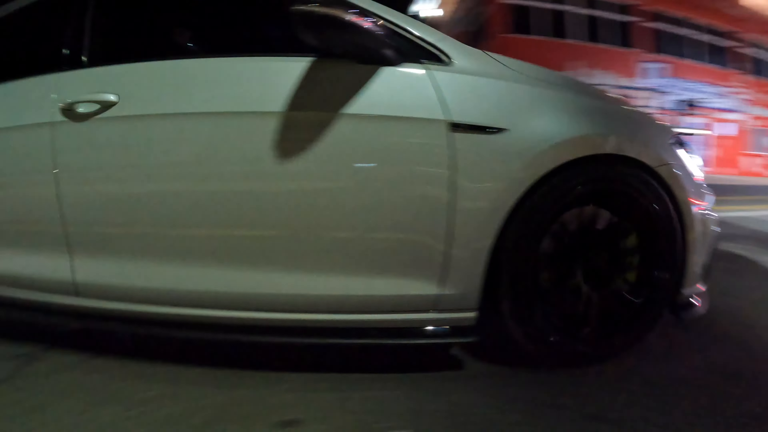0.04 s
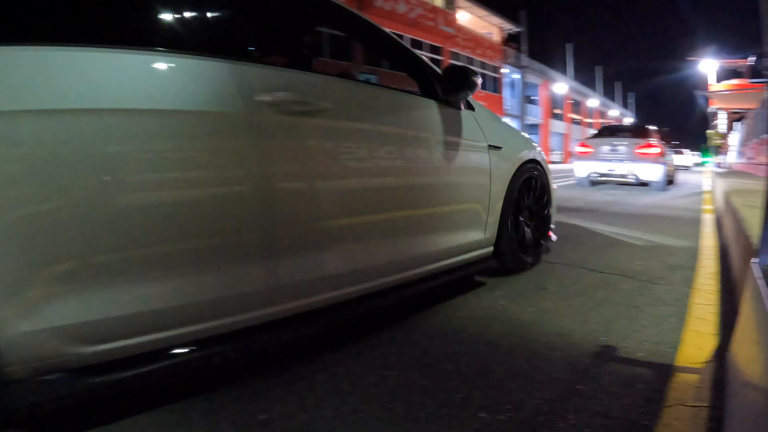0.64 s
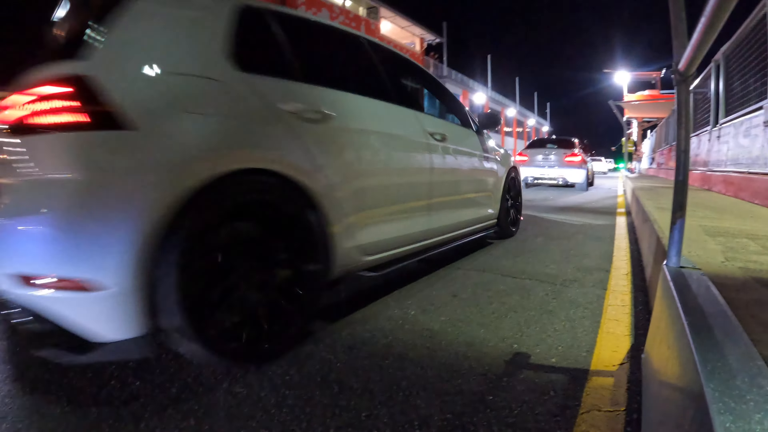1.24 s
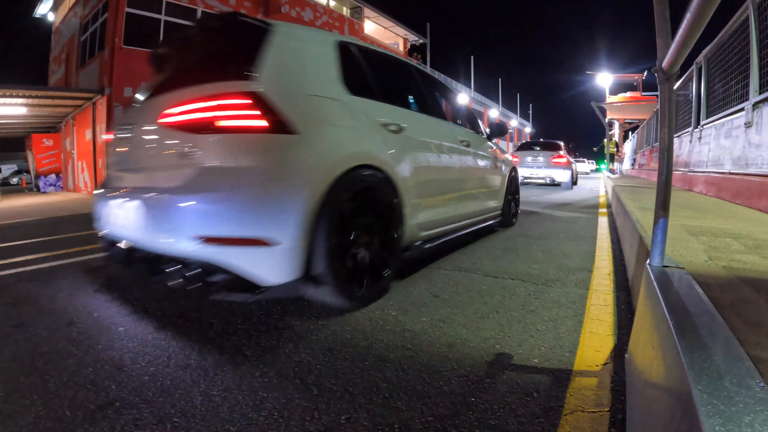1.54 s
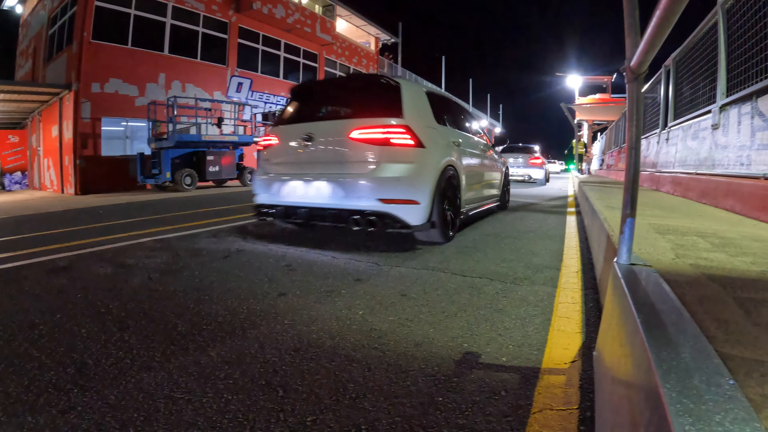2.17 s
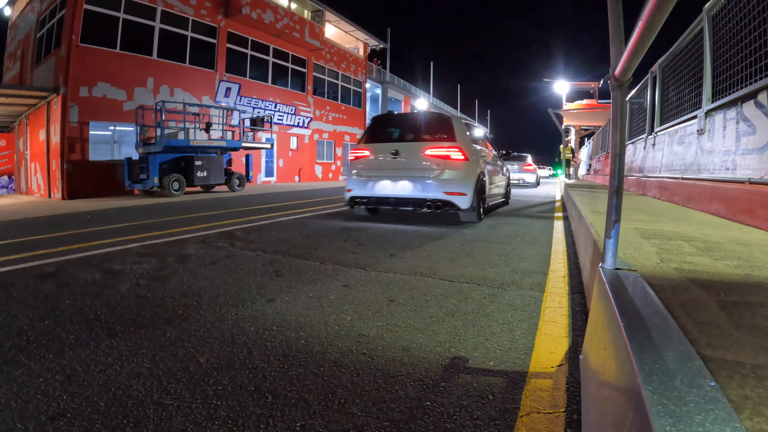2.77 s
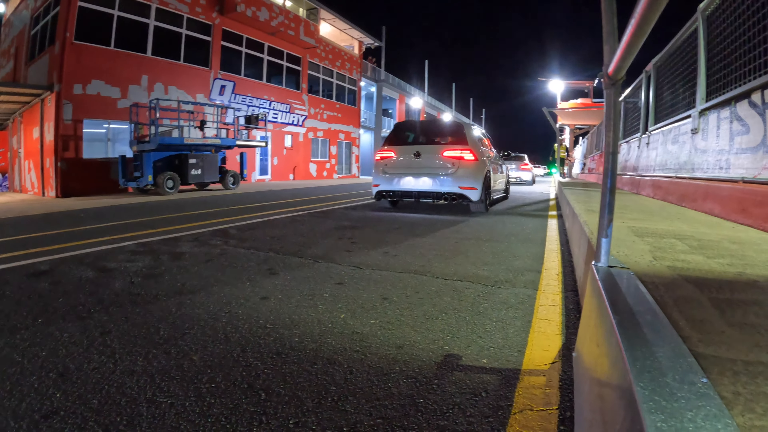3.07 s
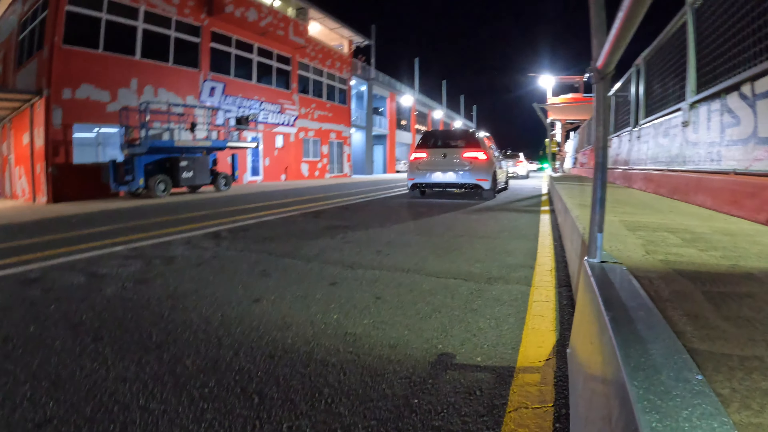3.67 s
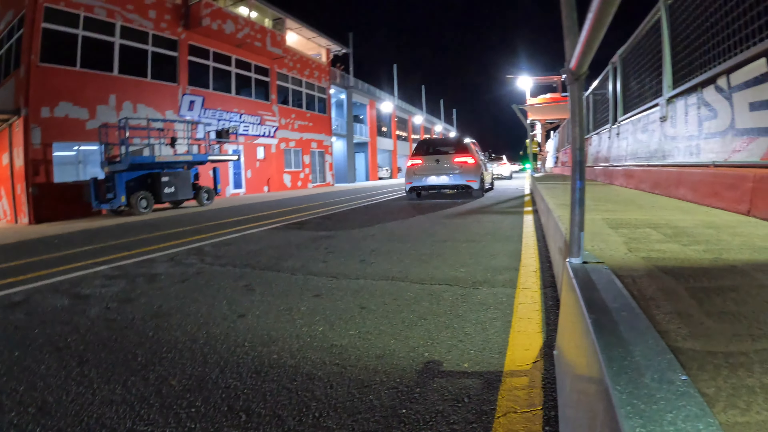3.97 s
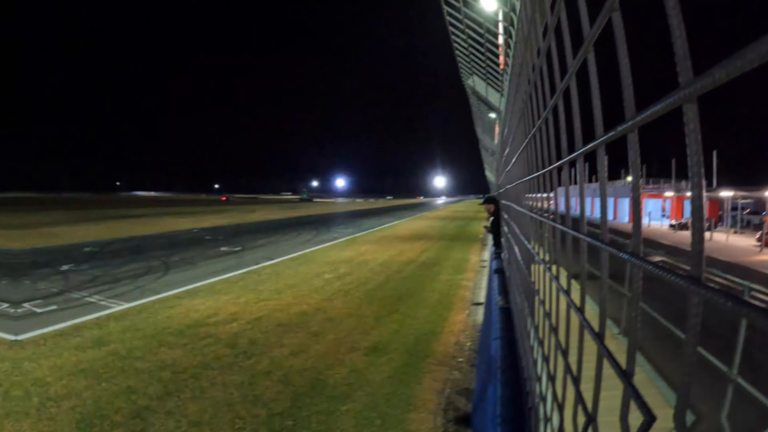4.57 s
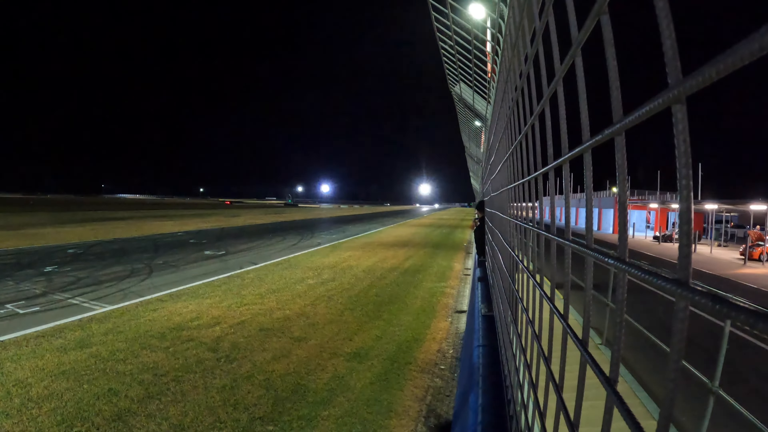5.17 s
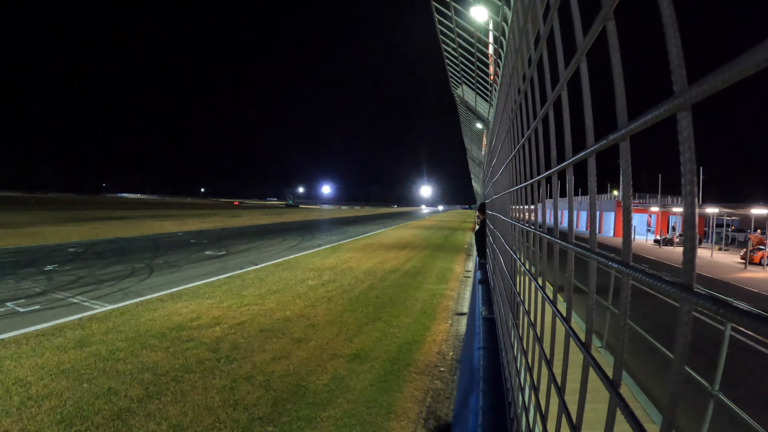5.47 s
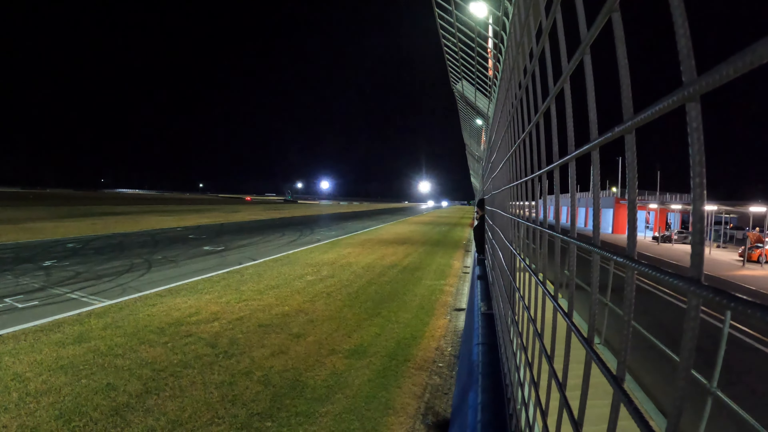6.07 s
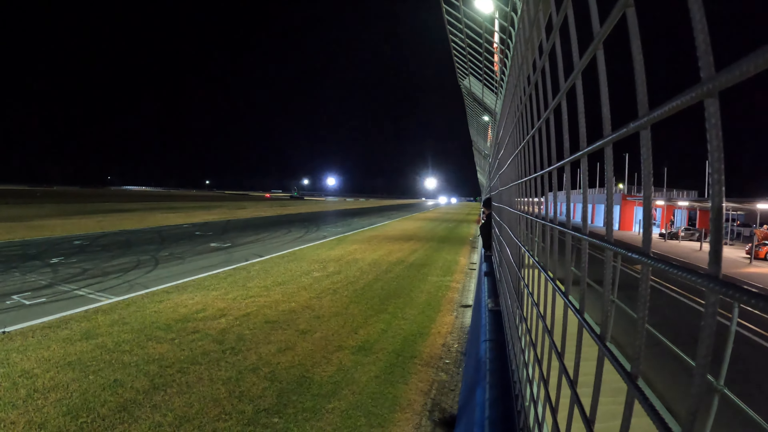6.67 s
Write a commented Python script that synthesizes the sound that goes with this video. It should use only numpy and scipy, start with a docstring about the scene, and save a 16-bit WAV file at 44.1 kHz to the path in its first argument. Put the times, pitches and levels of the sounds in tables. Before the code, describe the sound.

A turbo hatchback crawls close past the microphone in a pit lane, with small tyre chirps, gear whine and a throbbing exhaust. It picks up revs with a deep boom, a rasp of gas and a brief panel buzz, then rolls away as other engines burble and pull off. The nearby engines drop out as the microphone turns to the open track, where a distant race car drones at full throttle, growing louder.

```python
"""Night pit lane, then the straight

A turbo hatchback crawls past, picks up revs and rolls away behind other cars. Its firing pulses boom
and throb in a resonant pipe, gas rasps out in puffs and a loose panel briefly buzzes. Engines up the
lane burble and pull away, blurred by the pit walls into rumble and roar. The microphone then turns
to the track, where a distant racer drones down the straight at full throttle."""
import sys
import numpy as np
from scipy import signal
from scipy.fft import rfft, irfft, next_fast_len
from scipy.io import wavfile

SR = 44100
rng = np.random.default_rng(int(sys.argv[2]) if len(sys.argv) > 2 else 0)


def generate_wav(signal):
    """Clip the signal to [-1, 1] and save it as 16-bit WAV at the path in sys.argv[1]."""
    frames = np.transpose(np.atleast_2d(signal))
    scaled = np.clip(frames, -1, 1) * 32767
    pcm = np.round(scaled).astype(np.int16)
    wavfile.write(sys.argv[1], SR, pcm)


N = 304731
T = np.arange(N) / SR
TURN_S, TURN_LENGTH_S = 4.42, .42  # the microphone swings from the lane to the track
SHADE_DB = -27  # the pit wall shades the side it is not facing


def gain_of(db):
    """Decibels to amplitude."""
    return 10 ** (np.asarray(db) / 20)


def unit_rms(x):
    """Scales to unit rms."""
    return x / np.sqrt(np.mean(x ** 2) + 1e-20)


def curves(rows):
    """Each column after a table's time column as a curve over the scene."""
    times, *columns = np.transpose(rows)
    return [np.interp(T, times, column) for column in columns]


def swell(start, end, db, rise, fall):
    """A gain that holds db from start to end [s], with rise and fall slopes in dB per second."""
    return gain_of(db - rise * np.maximum(start - T, 0) - fall * np.maximum(T - end, 0))


def hump(at, half_length):
    """A bell curve in time [s], peaking at 1."""
    return np.exp(-((T - at) / half_length) ** 2)


def turned():
    """0 while the microphone faces the lane, 1 once it faces the track."""
    return np.clip((T - TURN_S) / TURN_LENGTH_S, 0, 1)


def turns_of(hz):
    """Cycles completed so far."""
    return np.cumsum(hz) / SR


def drift(hz):
    """A random wander of unit rms, with rates up to about hz."""
    size = next_fast_len(N)
    f = np.fft.rfftfreq(size, 1 / SR)
    spectrum = rfft(rng.standard_normal(size)) / (1 + (f / hz) ** 4)
    return unit_rms(irfft(spectrum, size)[:N])


def colour(x, points, size=8192):
    """Minimum-phase EQ through (frequency [Hz], gain [dB]) points; the result has unit rms."""
    hz, db = np.transpose(points)
    f = abs(np.fft.fftfreq(size, 1 / SR))
    log_gain = np.log(gain_of(np.interp(np.log(f + 1), np.log(hz), db)))
    # roll off beyond both ends of the curve
    log_gain -= np.log1p((f / hz[-1]) ** 4) / 2 + np.log1p((hz[0] / (f + 2)) ** 2) / 2
    response = np.exp(np.conj(signal.hilbert(log_gain)))
    impulse = np.fft.ifft(response).real[:size // 2]
    return unit_rms(signal.oaconvolve(x, impulse)[:N])


def noise(points):
    """Noise with the given spectrum."""
    return colour(rng.standard_normal(N), points)


def resonate(x, hz, width_hz):
    """A resonance at hz, which may be steady or a curve."""
    carrier = np.exp(2j * np.pi * turns_of(hz * np.ones(N)))
    pole = np.exp(-np.pi * width_hz / SR)
    return (carrier * signal.lfilter([(1 - pole) ** 2], [1, -2 * pole, pole ** 2], x / carrier)).real


def tone(turns, flutter, flutter_hz):
    """One partial, fluttering in level and phase as its echoes shift."""
    angle = 2 * np.pi * (turns + rng.random())
    in_phase = (1 + flutter * drift(flutter_hz)) * np.cos(angle)
    quadrature = flutter * drift(flutter_hz) * np.sin(angle)
    return unit_rms(in_phase + quadrature)


def tones(turns, orders, flutter, flutter_hz):
    """A stack of fluttering partials from (multiple, relative level [dB]) rows, at unit rms."""
    return unit_rms(sum(gain_of(db) * tone(order * turns, flutter, flutter_hz) for order, db in orders))


def firings(turns, cylinders, rough):
    """One pulse a firing, sized by its cylinder and by uneven combustion."""
    at = np.flatnonzero(np.diff(np.floor(turns)))
    pulses = np.zeros(N)
    pulses[at] = np.resize(cylinders, len(at)) * (1 + rough * rng.standard_normal(len(at)))
    return pulses


def open_track():
    """The track's distant wash opens up with the turn; a low rumble builds under the racer."""
    # spectra of the wash and the rumble: (frequency [Hz], relative level [dB])
    wash_eq = [(60, 0.5), (200, -7), (400, -6.5), (700, -2), (900, -8), (1200, -10), (1550, -12.5),
               (2000, -23.5), (3200, -24.5), (4200, -31), (5200, -44), (8000, -50.5), (11000, -66.5)]
    rumble_eq = [(30, -16), (55, -2), (85, 2.5), (140, 0.5), (230, -6.5), (300, -8.5), (420, -16),
                 (800, -38)]
    wash = gain_of(-56 + 13 * turned() + drift(13)) * noise(wash_eq)
    return wash + swell(6, 6.8, -33, rise=7.5, fall=10) * noise(rumble_eq)


def lane_bed():
    """Engines and tyres smeared by the pit walls into rumble, roar and hiss."""
    # low, middle and high layers of the bed: (frequency [Hz], relative level [dB])
    rumble_eq = [(18, -19), (35, -7.5), (60, -5), (90, 0), (135, -0.5), (175, -3), (230, -6.5), (300, -11),
                 (420, -19.5), (800, -44)]
    roar_eq = [(150, -13), (300, -5), (450, 0), (600, -2.5), (750, -12.5), (950, -13.5), (1150, -15),
               (1450, -15.5), (1750, -26), (2500, -32), (5000, -58)]
    hiss_eq = [(800, -16), (1800, 2), (2200, -1.5), (3000, -1.5), (3600, -7), (4300, -12.5), (6000, -16.5),
               (8000, -21), (10000, -30.5), (14000, -40)]
    coasting_db, pull_away_db = -2.5 * hump(2.4, .65), 4 * hump(3.97, .32)  # the queue of cars
    since_turn = np.maximum(T - TURN_S - TURN_LENGTH_S, 0)
    rumble = gain_of(-22 - 1.2 * T + coasting_db - 13.5 * turned()) * noise(rumble_eq)
    roar = swell(2.1, 4.52, -35.5, rise=2.5, fall=22) * gain_of(.62 * drift(26)) * noise(roar_eq)
    hiss = gain_of(-55 - 7 * turned() - 4 * since_turn + .98 * drift(6.6)) * noise(hiss_eq)
    return gain_of(pull_away_db) * (rumble + roar + hiss)


def air_rushes():
    """Bright, flickering swells of air."""
    # one swell a rush: (start [s], end [s], level [dB], rise [dB/s], fall [dB/s])
    rushes = [(0, 0.09, -57, 10, 18), (.74, 0.817, -59.5, 50, 37), (3.844, 4.198, -67.5, 22, 8.2),
              (4.981, 5.034, -68, 40, 29)]
    # their spectrum: (frequency [Hz], relative level [dB])
    air_eq = [(1000, -5), (2000, -1.5), (3500, 0.5), (5500, -1.5), (8000, -11.5), (11000, -20.5),
              (12500, -17), (15000, -26)]
    return sum(swell(*row) for row in rushes) * gain_of(1.4 * drift(30)) * noise(air_eq)


def thin_squeal():
    """A faint, high squeal up the lane, creeping up in pitch."""
    hz = 5950 + 70 * (T - 3.4)
    level = swell(3.4, 4.2, -73.5, rise=16, fall=60) * gain_of(2.3 * drift(9))
    return level * tone(turns_of(hz), flutter=3, flutter_hz=230)


def tyre_squeaks():
    """Brief chirps of rubber, close by and later in a distant corner."""
    # chirps: (time [s], half length [s], pitch [Hz], level [dB])
    chirps = [(0.084, 0.0082, 1560, -34), (0.122, .011, 1630, -34), (0.25, 0.011, 1640, -42),
              (.36, .012, 1620, -40), (0.674, 0.016, 1030, -31), (5.25, .023, 1240, -47),
              (5.387, .022, 1220, -46.5)]
    return sum(gain_of(db) * hump(at, half) * tone(hz * T, flutter=.51, flutter_hz=30)
               for at, half, hz, db in chirps)


def throbbing_car():
    """A car further off throbs briefly on its firing tone and third harmonic."""
    # its revs: (time [s], firing rate [Hz])
    revs = [(4.1, 66), (4.5, 73), (5.15, 78.8)]
    throb = tones(turns_of(curves(revs)[0]), [(1, 1), (3, -4.5)], flutter=.51, flutter_hz=21)
    return swell(4.5, 4.62, -27, rise=55, fall=70) * throb


def far_car():
    """A far engine gathers speed, and its sixth order sings out for a moment."""
    # its revs: (time [s], crank speed [turns/s])
    revs = [(2.3, 59.4), (2.8, 61.2), (3.1, 62.45), (3.8, 65.4), (4.1, 64.8), (4.3, 65.4), (4.6, 67.4),
            (5, 70)]
    # its engine orders: (multiple of crank speed, relative level [dB])
    orders = [(3, -0.5), (4, 0.5), (5, -6), (6, -3)]
    crank = turns_of(curves(revs)[0])
    hum = swell(2.95, 3.35, -30.5, rise=18, fall=10) * tones(crank, orders, flutter=.14, flutter_hz=8.8)
    sixth = swell(4.15, 4.5, -29.5, rise=45, fall=62) * tone(6 * crank, flutter=.2, flutter_hz=18)
    return hum + sixth


def leading_car():
    """The smooth engine note of the leading car, pulling out and droning on far away."""
    # its run: (time [s], firing rate [Hz], level [dB])
    run = [(3, 104, -59.5), (3.7, 114, -32.5), (4, 120, -25), (4.5, 128, -25), (4.9, 131, -40),
           (5.3, 128, -35), (6, 160, -39), (6.9, 141, -34.5)]
    # its engine orders: (multiple of firing rate, relative level [dB])
    orders = [(.5, -19.5), (1, 4), (1.5, -7), (2, -7), (2.5, -22), (3, -22)]
    hz, db = curves(run)
    return gain_of(db) * tones(turns_of(hz), orders, flutter=.34, flutter_hz=19)


def next_car():
    """The next car up the lane burbles as uneven firings ring its pipe."""
    # its run: (time [s], firing rate [Hz], level [dB])
    run = [(0, 67, -20), (.4, 62, -20), (.75, 65.7, -23.5), (1.3, 57, -26), (1.9, 65, -28.5),
           (2.2, 70, -24.5), (2.5, 68, -23), (2.8, 75, -23.5), (3.1, 74.5, -28), (3.4, 83, -27.5),
           (3.68, 86.6, -21), (4, 90, -24), (4.3, 96, -25), (4.9, 110, -31)]
    # its pipe's response: (frequency [Hz], relative level [dB])
    pipe_eq = [(30, -26), (62, 2.5), (90, 5.5), (130, 3), (165, -2.5), (200, -6.5), (250, -9), (285, -5),
               (320, -12), (370, -16.5), (430, -13.5), (520, -19), (900, -38), (2000, -58)]
    hz, db = curves(run)
    pulses = firings(turns_of(hz), cylinders=[1.15, .7, .82, .95], rough=.22)
    return gain_of(db) * colour(pulses, pipe_eq)


def racer():
    """A four-cylinder at full throttle far away: a clean firing tone over weaker, wavering orders."""
    # its revs: (time [s], engine cycle rate [Hz])
    revs = [(3.9, 36.5), (4.3, 37.8), (4.73, 37.9), (5, 38.75), (5.6, 38.96), (6.02, 39.26), (6.5, 39.55),
            (6.91, 40.4)]
    # brief dips in the firing tone: (time [s], half length [s], depth [dB])
    dips = [(4.75, 0.051, 6.5), (4.994, 0.065, 6.5), (5.42, 0.11, 7.5), (5.925, 0.027, 6),
            (6.153, 0.012, 8.5), (6.803, 0.14, 5)]
    # the firing tone's octave waxes and wanes: (time [s], level before shading [dB])
    octave_fader = [(4.76, -55), (4.86, -34.5), (4.95, -53), (5.0, -32), (5.49, -44), (5.53, -36),
                    (6.12, -37), (6.35, -28), (6.57, -45), (6.81, -27.5), (6.91, -33)]
    # orders from around the double octave up, and the rest: (multiple of cycle, relative level [dB])
    upper_orders = [(15, -5), (16, 2.5), (17, -9), (20, -7.5), (26, -16), (27, -17)]
    body_orders = [(2, -1.5), (3, 1), (5, 6), (6, -3), (7, 0), (9, -5.5), (11, -13.5), (12, -8), (13, -17),
                   (14, -19.5), (15, -15), (17, -17.5), (20, -19), (24, -18), (31, -22)]
    cycles = turns_of(curves(revs)[0])
    fired = 4 * cycles
    dip_db = sum(depth * hump(at, half) for at, half, depth in dips)
    firing_level = swell(4.64, 6.91, -19.8, rise=105, fall=10) * gain_of(-dip_db)
    firing = firing_level * tone(fired, flutter=.06, flutter_hz=14)
    octave_db = curves(octave_fader)[0] + SHADE_DB * (1 - turned())
    octave = gain_of(octave_db) * tone(2 * fired, flutter=.12, flutter_hz=10)
    upper = tones(cycles, upper_orders, flutter=.25, flutter_hz=10)
    upper *= swell(4.9, 5.95, -45.5, rise=18, fall=32)
    # the third harmonic carries over the wall first
    third = swell(4.15, 4.4, -34, rise=40, fall=36) * tone(3 * fired, flutter=.2, flutter_hz=10)
    body = tones(cycles, body_orders, flutter=.31, flutter_hz=11)
    body *= swell(4.7, 6.91, -35.5, rise=20, fall=10)
    build = gain_of(2 * (T - 4.64))  # louder as it runs down the straight
    return build * (firing + third + upper + body) + octave


def turbo():
    """Thin whistles of air through the hatchback's turbo as the revs rise."""
    # whistle peaks over hiss: (frequency [Hz], relative level [dB])
    whistle_eq = [(3500, -7.5), (4300, 3), (5200, 2), (6500, -7), (7000, -3.5), (7500, -1), (7900, -8.5),
                  (9000, -13), (11400, -20.5), (12300, -16.5), (13200, -21)]
    return swell(1.8, 2.02, -62.5, rise=65, fall=24) * noise(whistle_eq)


def tyre_scuffs():
    """The hatchback's tyres scuff the tarmac in short bursts of noise."""
    # scuffs: (time [s], half length [s], level [dB])
    scuffs = [(0.089, 0.036, -32.5), (0.33, 0.036, -37), (0.682, 0.029, -32)]
    # their spectrum: (frequency [Hz], relative level [dB])
    scuff_eq = [(500, -20), (800, -5), (1010, 4), (1150, -11), (1450, -15), (1650, -11.5), (1900, -19),
                (2400, -26), (2800, -21), (4000, -34), (8000, -55)]
    return sum(gain_of(db) * hump(at, half) for at, half, db in scuffs) * noise(scuff_eq)


def gear_whine():
    """The gears' whine sags and lifts as the hatchback slows and picks up again."""
    # the gear note: (time [s], pitch [Hz])
    note = [(0, 1010), (.25, 940), (.4, 880), (.55, 842), (.75, 832), (.9, 845), (1.25, 886)]
    # its partials: (multiple of pitch, relative level [dB])
    partials = [(.733, -2.5), (1, -2.5), (1.143, -3), (2.271, -14)]
    whine = tones(turns_of(curves(note)[0]), partials, flutter=.6, flutter_hz=20)
    return swell(.3, 1, -40, rise=15, fall=30) * whine


def engine_bay(crank):
    """Hiss that ticks with each firing, and belt whine, while the front of the car is close."""
    # hiss of the bay and front tyre: (frequency [Hz], relative level [dB])
    hiss_eq = [(200, -9), (400, -5), (650, 4), (780, -1.5), (980, -0.5), (1300, -5), (1600, -9.5),
               (1880, -12), (2300, -16), (2750, -20), (3300, -19), (4100, -28), (5400, -31.5), (8000, -41),
               (11000, -50), (14000, -52.5)]
    # belt and engine whine: (multiple of crank speed, relative level [dB])
    belt_orders = [(14, 6.5), (18, -5.5), (22, -1.5), (26, -1.5), (30, 0), (48, -5), (51, -0.5), (92, -11),
                   (96, -9)]
    ticks = 1 + .63 * np.exp(-(2 * crank % 1) / .2)
    ticking = ticks * gain_of(.46 * drift(40)) * rng.standard_normal(N)
    receding = gain_of(-7 * T)  # the nose of the car moves off
    hiss = swell(0, 1.25, -31, rise=10, fall=24.5) * receding * colour(ticking, hiss_eq)
    whine = tones(crank, belt_orders, flutter=.4, flutter_hz=12)
    return hiss + swell(.12, .72, -34.5, rise=30, fall=15) * whine


def buzzing_panel(crank, surge):
    """Firings shake loose sheet metal, every second one harder; at high revs it slaps its mount."""
    # the main note lifts with harder shaking: (time [s], pitch [Hz])
    note = [(1.76, 2670), (1.85, 2890), (1.97, 2960), (2.07, 3050), (2.16, 2930), (2.3, 2960), (2.45, 3030)]
    # panel modes: (multiple of main note, width [Hz], gain [dB])
    modes = [(.74, 380, -8), (.84, 330, -7), (1, 400, 0), (1.18, 400, -17)]
    # slaps against the mount: (time [s], level [dB])
    hits = [(1.7852, -41), (1.824, -39), (1.8615, -37.5), (1.8796, -37), (1.8964, -40), (1.951, -36),
            (1.968, -35), (2.022, -39), (2.0392, -36), (2.058, -35.5), (2.0777, -35), (2.1136, -42)]
    slap_decay_s = .0045
    shake = unit_rms((.35 + surge ** 2) * (1 + .35 * np.cos(2 * np.pi * crank)))
    settling = gain_of(-89 * np.maximum(T - 2.44, 0))  # the throttle eases
    buzz = swell(1.85, 2.12, -46.5, rise=70, fall=12) * settling * shake
    slaps = sum(gain_of(db) * (T >= at) * np.exp(-abs(T - at) / slap_decay_s) for at, db in hits)
    chatter = (buzz + slaps) * rng.standard_normal(N)
    hz = curves(note)[0]
    # the square root makes up the level that noise loses in a narrow band
    return sum(gain_of(db) * resonate(chatter, ratio * hz, width) * np.sqrt(4 * SR / (np.pi * width))
               for ratio, width, db in modes)


def exhaust_gas(surge):
    """Puffs of gas rasp and growl out of the tailpipe, and ring it at the top of the rev."""
    # the broad rasp and the hollow growl: (frequency [Hz], relative level [dB])
    rasp_eq = [(150, -18), (310, -0.5), (520, -3.5), (700, -4.5), (900, -7), (1250, -10), (1500, -14.5),
               (1680, -18), (1850, -21.5), (2200, -18), (3200, -29), (4200, -34.5), (5400, -45),
               (7600, -55.5), (14000, -67.5)]
    growl_eq = [(550, -24.5), (720, 3), (790, 4.5), (870, -10.5), (1000, -19.5), (1230, -12.5),
                (1450, -27.5), (2500, -45)]
    puffs = (1 + .56 * surge) * rng.standard_normal(N)
    rasp = swell(1.6, 1.9, -35, rise=50, fall=9) * colour(puffs, rasp_eq)
    throttle_opening = swell(1.55, 1.8, -43, rise=40, fall=60)
    departing = swell(2.4, 2.75, -39.5, rise=70, fall=35)
    growl = (throttle_opening + departing) * colour((.5 + surge) * rng.standard_normal(N), growl_eq)
    ring = unit_rms(resonate(surge ** 2 * rng.standard_normal(N), hz=1616, width_hz=220))
    ring *= swell(2.6, 2.07, -41.5, rise=68, fall=109)  # the slopes overlap, so it stays very faint
    far_rasp = unit_rms(resonate(puffs, hz=2830, width_hz=600))
    far_rasp *= swell(3.82, 4, -57, rise=35, fall=45)  # pulling away up the lane
    return rasp + growl + ring + far_rasp


def exhaust_note(crank):
    """Firing pulses ring the pipe over a boom at the firing rate, its octave and a higher bark."""
    # the four cylinders in firing order: (relative strength)
    cylinders = [1.15, 1.1, 0.96, 1]
    # the pipe's response to one pulse: (frequency [Hz], relative level [dB])
    pipe_eq = [(60, -38), (108, -10.5), (128, -2.5), (150, -13.5), (168, -6.5), (186, 1), (220, 3.5),
               (250, -4.5), (280, -14), (300, -12), (332, -10.5), (360, -19), (390, -11), (440, -25),
               (500, -29), (620, -35), (900, -48), (1400, -62)]
    # the pipe with throttle and distance, the octave as the tailpipes pass: (time [s], level [dB])
    pipe_fader = [(0, -21.5), (.45, -24), (.8, -18.5), (1.3, -19.5), (1.65, -15.5), (1.96, -16), (2.3, -29),
                  (3.1, -29.5), (3.6, -34.5), (4.4, -30.5)]
    octave_fader = [(0, -28.5), (.55, -25), (.7, -19.5), (.9, -24), (1.3, -16.5), (1.55, -18), (1.7, -28.5),
                    (1.95, -23), (2.65, -25.5), (3, -37)]
    # higher orders, heard from behind the car: (multiple of crank speed, relative level [dB])
    bark_orders = [(3, -5.5), (5, -3), (6, -2.5), (10, -2), (11, -6.5), (12, -6), (14, 3.5), (15, -7.5),
                   (16, -8), (18, -2.5), (20, -7.5), (21, -9), (24, -15)]
    fired = 2 * crank
    rear_on = np.clip((T - 1.586) / .23, 0, 1)  # the tailpipes come to face the microphone
    rolling_away_db = -5.5 * np.maximum(T - 3.18, 0)
    boom_level = gain_of(-23.5 + 7.5 * rear_on + rolling_away_db) * (1 + .069 * drift(18))
    boom = boom_level * unit_rms(np.sin(2 * np.pi * fired))
    octave = gain_of(curves(octave_fader)[0]) * unit_rms(np.sin(2 * np.pi * 2 * fired))
    pipe = gain_of(curves(pipe_fader)[0]) * colour(firings(fired, cylinders, rough=.04), pipe_eq)
    bark = tones(crank, bark_orders, flutter=.15, flutter_hz=8)
    bark *= swell(1.9, 2.12, -26.5, rise=60, fall=11)
    return boom + octave + pipe + bark


def hatchback():
    """A four-cylinder fires twice a crank turn, driving exhaust, panel and bay over gears and tyres."""
    # its revs: (time [s], crank speed [turns/s])
    revs = [(0, 21.3), (.25, 20.1), (.47, 19.85), (.75, 19.05), (1, 18.6), (1.33, 18.1), (1.52, 19.1),
            (1.68, 22.5), (1.87, 27.9), (2, 27.8), (2.2, 26.95), (2.55, 27.9), (2.8, 27.7), (3.1, 26.8),
            (3.45, 25.9), (3.7, 26.8), (4, 27.9), (4.7, 28.6)]
    crank = turns_of(curves(revs)[0] * (1 + .0024 * drift(12)))
    surge = .5 + .5 * np.cos(2 * np.pi * 2 * crank)  # one rush of gas a firing
    exhaust = exhaust_note(crank) + exhaust_gas(surge)
    return exhaust + buzzing_panel(crank, surge) + engine_bay(crank) + gear_whine() + tyre_scuffs()


def scene():
    """The mono mix; the two nearest engines drop away as the microphone turns."""
    near = gain_of(SHADE_DB * turned()) * (hatchback() + next_car())
    whistles = thin_squeal() + turbo()
    distant = leading_car() + throbbing_car() + far_car() + racer()
    return (near + whistles + distant + tyre_squeaks() + lane_bed() + air_rushes() + open_track())[None]


def record(dry):
    """A steep high cut at 15 kHz."""
    high_cut = signal.firwin(511, 15000, window=("kaiser", 9), fs=SR)
    return signal.oaconvolve(dry, high_cut[None], "same")


dry = scene()
out = record(dry)
generate_wav(out)
```